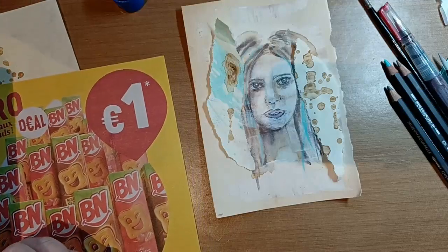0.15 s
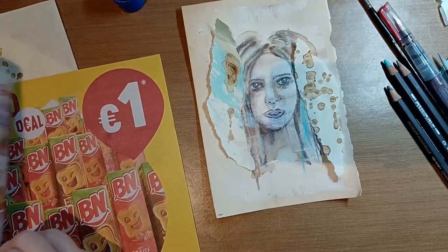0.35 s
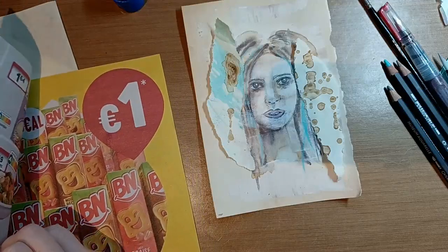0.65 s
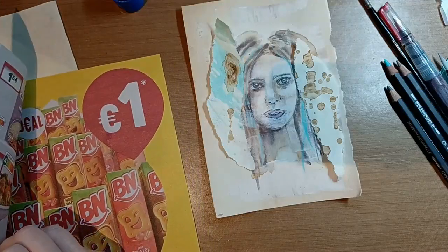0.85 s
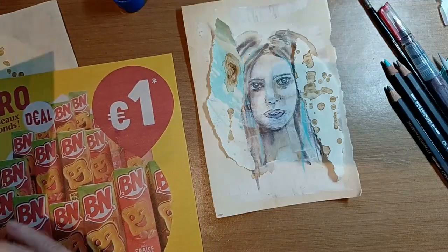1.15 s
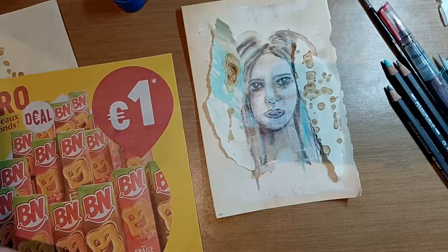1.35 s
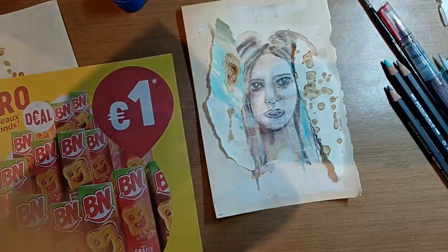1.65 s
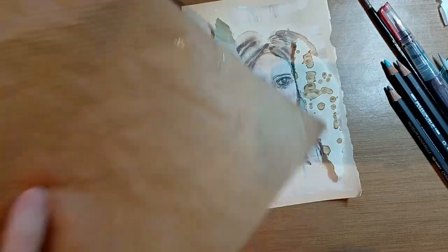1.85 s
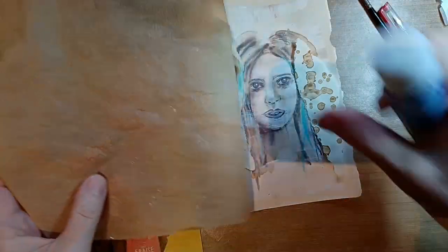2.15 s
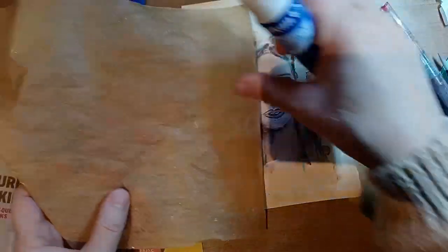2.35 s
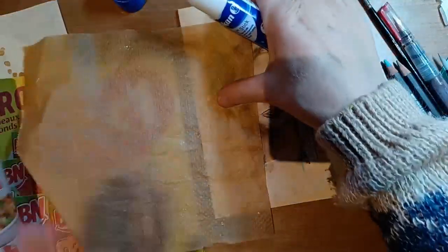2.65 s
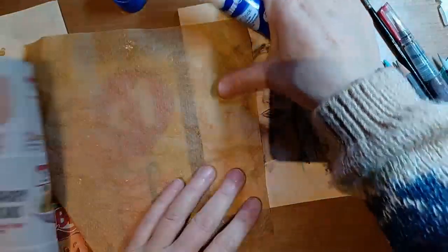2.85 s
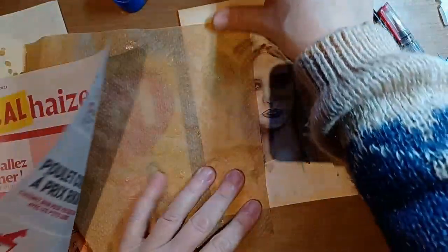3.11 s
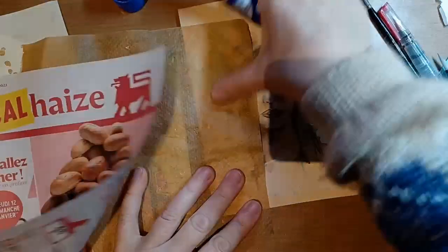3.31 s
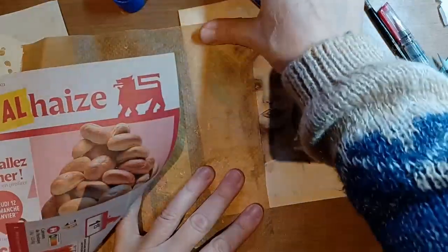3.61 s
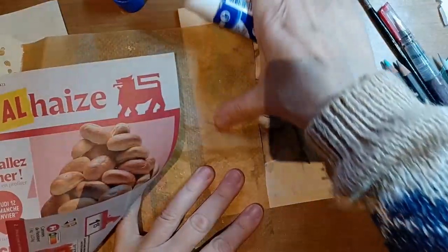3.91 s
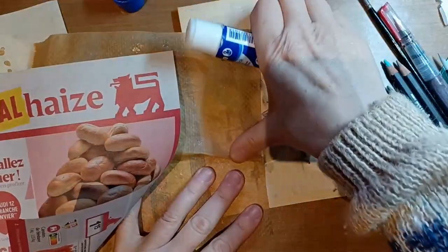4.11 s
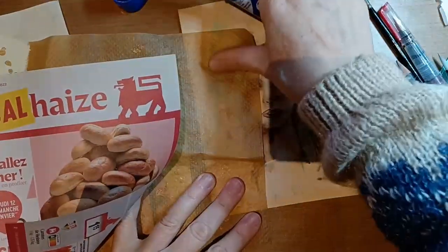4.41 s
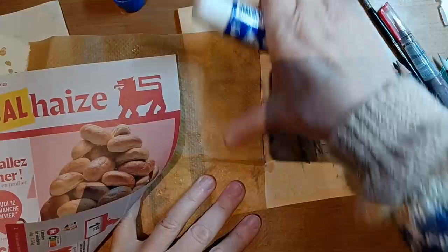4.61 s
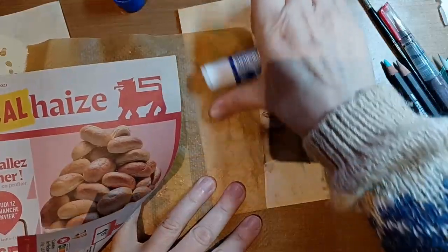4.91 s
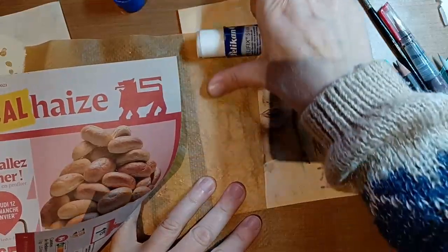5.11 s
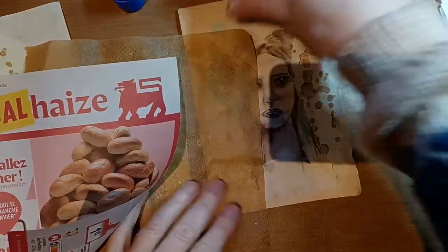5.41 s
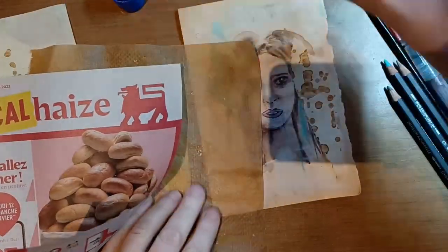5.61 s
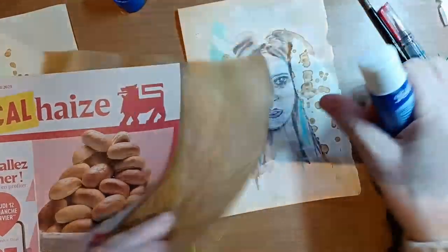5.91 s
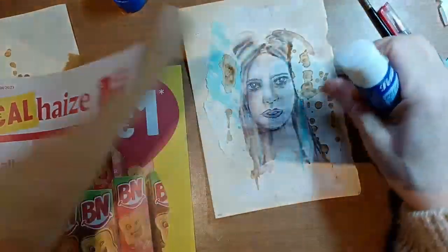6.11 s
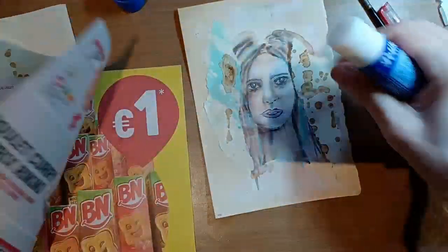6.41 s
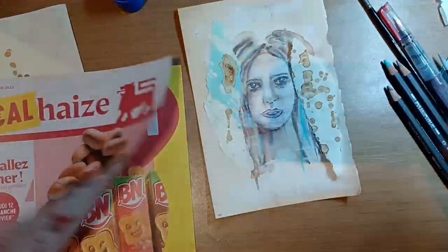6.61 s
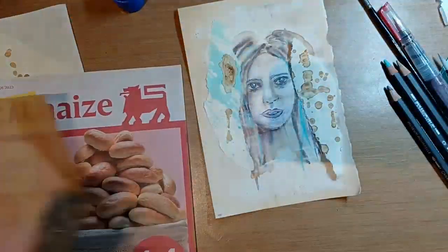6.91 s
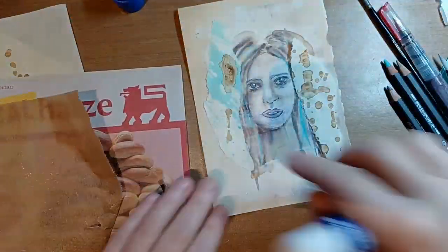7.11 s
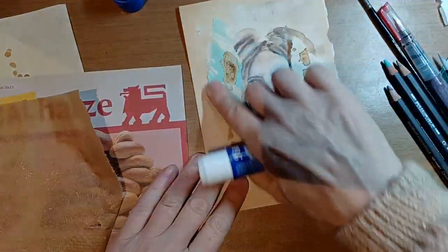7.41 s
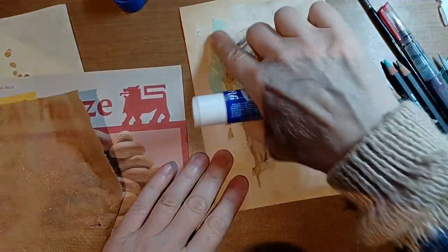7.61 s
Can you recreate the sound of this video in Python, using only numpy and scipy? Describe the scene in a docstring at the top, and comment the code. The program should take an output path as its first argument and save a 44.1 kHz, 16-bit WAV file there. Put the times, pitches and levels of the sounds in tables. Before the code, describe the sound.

A small quiet room, paper handled very close to the microphone, leaning a little left. From 0 to 0.6 s a sheet is lifted and flapped with crisp rustling and sharp snaps. After a brief lull, turning resumes from 0.8 to 1.4 s, with a short papery squeak near 1.0, and from 1.5 to 2.0 s stiffer paper crackles brightly. Shorter rustles follow at 2.2 and 2.5, then a snap with a soft low thud at 2.8. Faint sliding and isolated ticks lead to a loud bright crinkling burst at 3.9-4.1 s, with smaller rubs after. At 4.8 a rustle meets a firm, hollow wooden knock at 4.9, quickly damped. From about 5.2 s a thin steady hiss remains. A last flurry of ticks and flapping comes at 5.7-6.1 s, with a faint bump; then sparse, very soft sliding, barely above the hiss, to the end at about 7.6 s.

```python
"""Glossy and baking paper are leafed through and pushed about on a wooden desk, close to the microphone.
Sliding is noise split into smooth friction and stick-slip grains; buckles and creases are decaying bursts. The
desk echoes the rustle, buckles and creases with a gliding delay; swelling noise bands make the sheets drum or
sing. Hand bumps ring decaying modes of the desk; a small room answers the paper with a diffuse tail. Coloured
noise gives the quiet background and a thin steady hiss that sets in for the last third."""
import sys
import numpy as np
from scipy import signal
from scipy.fft import rfft, irfft
from scipy.io import wavfile
from scipy.ndimage import uniform_filter1d, map_coordinates

SR = 44100
rng = np.random.default_rng(int(sys.argv[2]) if len(sys.argv) > 2 else 0)


def to_wav(sig):
    """Store sig (one row per channel, or 1-D mono) as 16-bit WAV at the path in sys.argv[1].

    Samples outside -1..1 are clipped; the rate is SR.
    """
    pcm = np.clip(np.atleast_2d(sig), -1, 1) * 32767
    pcm = np.round(pcm).astype(np.int16)
    wavfile.write(sys.argv[1], SR, pcm.T)  # frames by channels


N = 341775
TIME = np.arange(N) / SR
BANDS_HZ = 88 * 2 ** (np.arange(16) / 2)  # half-octave centres

# stick-slip part of the sliding: (time [s], share of power [0-1])
CRINKLE = [(0, 0.95), (1.07, .6), (1.6, 1), (3.05, 0.4), (3.9, 0.97), (4.42, .95), (4.5, .15), (5.8, 1),
           (6.1, 0.7), (6.9, 0.12)]
# colour of the sliding: (frequency [Hz], relative level [dB per half octave])
SLIDE_COLOUR = [(110, -29), (220, -21), (550, -7), (1100, -11.5), (5500, -1), (8500, -6), (12000, -1.5),
                (16000, -2)]


def sliding(patchy_db, own_share):
    """Stick-slip friction: smooth rubbing noise plus grains, some broad, some confined to a zone of pitch."""
    zone_levels_db = handling()
    share = np.clip(in_time(CRINKLE)[0], 0, 1)
    own = np.clip(own_share, 0, 1)
    broad, *by_zone = [slips(per_s=360, size_db=4.8, fade_s=.0011) for _ in range(4)]
    white = rng.standard_normal((2, 3, N))
    out = 0
    for k, hz in enumerate(BANDS_HZ):
        # how far this band belongs to the flapping, rubbing and hissing zones
        weights = np.array([at_hz(list(zip((360, 1500, 7000), zone)), hz) for zone in np.eye(3)])
        slip_power = (1 - own) * broad + own * (weights @ by_zone)
        grain = np.sqrt(1 - share + share * slip_power)
        level_db = weights @ zone_levels_db + at_hz(SLIDE_COLOUR, hz)
        level_db = level_db + patchy_db * drift(45)  # bending shifts the colour
        band = rms_one(half_octave(white[k % 2] * grain, hz))
        out = out + from_db(level_db) * band * paths(hz)
    return at_ports(out)


def slips(per_s, size_db, fade_s):
    """Stick-slip releases as a random pulse train: sudden, brief, very uneven power of local mean 1."""
    sizes = from_db(size_db * np.minimum(rng.exponential(1, N), 4)) ** 2
    releases = sizes * (rng.random(N) < per_s / SR) + 1e-9
    power = signal.lfilter([1], [1, -np.exp(-2 / (fade_s * SR))], releases)
    return power / uniform_filter1d(power, size=2600)


# a sheet is lifted, bent and turned over:
# (start [s], swell [s], hold [s], rubbing level [dB], hiss of the edges [dB above the rubbing])
TURNS = [(0.0, 0.19, 0.16, -38.5, -3), (0.266, 0.006, 0.015, -34, -1), (0.39, 0.07, 0.0081, -28.5, -9.5),
         (0.728, 0.0014, 0.13, -52.5, -23), (0.81, 0.019, 0.048, -41.5, -3.5),
         (0.88, 0.053, 0.14, -30.5, -6.5), (1.085, 0.013, 0.029, -30.5, -15),
         (1.157, 0.019, 0.15, -31.5, -10), (1.47, 0.024, 0.061, -30.5, -3), (1.59, 0.014, 0.07, -32, -22),
         (1.74, 0.048, 0.21, -33, -9.5), (2.133, 0.0035, 0.012, -32, -19), (2.2, 0.0088, 0.16, -48.5, -0.5),
         (2.445, 0.0038, 0.026, -34, -10), (2.505, 0.022, 0.069, -33, -0.5),
         (5.86, 0.051, 0.025, -29, -5.5), (5.95, 0.0085, 0.45, -44.5, 1)]
# a sheet is pushed or smoothed flat on the desk:
# (start [s], swell [s], hold [s], rubbing level [dB], hiss of the edges [dB above the rubbing])
SLIDES = [(2.81, 0.0021, 0.42, -51.5, 7), (3.31, 0.12, 0.13, -54.5, 11), (3.675, 0.11, 0.073, -43, 10),
          (3.84, 0.09, 0.1, -33.5, 9), (4.165, 0.014, 0.21, -44, 11), (4.48, 0.029, 0.025, -44.5, 3.5),
          (4.672, 0.027, 0.0083, -50.5, 12.5), (4.8, 0.068, 0.052, -32.5, 3.5),
          (4.99, 0.037, 0.82, -57.5, 10.5), (5.733, 0.016, 0.043, -43, 9.5), (6.5, 0.014, 0.011, -41, -0.5),
          (6.768, 0.014, 0.074, -53.5, 17), (6.78, 0.14, 0.055, -52.5, 21.5), (7.29, 0.13, 0.16, -54.5, 5),
          (7.58, 0.028, 0.071, -41.5, -38)]
# flapping against the rubbing for a typical move: a free sheet flaps, a flat one hardly does
TURN_FLAP_DB, SLIDE_FLAP_DB = -7.5, -15
# a longer move swings more of the sheet and flaps more
FLAP_DB_PER_DOUBLING, TYPICAL_MOVE_S = 2, 0.1


def handling():
    """Power addition of all moves: levels [dB] of flapping (360 Hz), rubbing (1500 Hz), edges (7000 Hz)."""
    power = np.full((3, N), 1e-12)
    for moves, kind_db in ((TURNS, TURN_FLAP_DB), (SLIDES, SLIDE_FLAP_DB)):
        for start_s, swell_s, hold_s, rub_db, edge_db in moves:
            doublings = np.log2((swell_s + hold_s) / TYPICAL_MOVE_S)
            flap_db = kind_db + FLAP_DB_PER_DOUBLING * doublings
            zone_db = rub_db + np.array([[flap_db], [0], [edge_db]])
            power += from_db(zone_db) ** 2 * gesture(start_s, swell_s, hold_s)
    return 10 * np.log10(power) + surges()


# every move starts this far down and dies away at this rate
SWELL_FROM_DB, SETTLE_DB_PER_S = -11.5, 188
# after a move the paper goes on creeping faintly
CREEP_DB, CREEP_DB_PER_S = -26, 74


def gesture(start_s, swell_s, hold_s):
    """Power envelope of one move: it swells, holds, settles quickly and leaves a faint creep."""
    age = TIME - start_s
    swell_db = SWELL_FROM_DB * np.clip(1 - age / swell_s, 0, 1)
    after = np.clip(age - swell_s - hold_s, 0, None)
    settle_db = np.maximum(-SETTLE_DB_PER_S * after, CREEP_DB - CREEP_DB_PER_S * after)
    return (age >= 0) * from_db(swell_db + settle_db) ** 2


SURGE_DB, SURGES_PER_S = 1.5, 31  # SURGE_DB is for a fully crinkling sheet


def surges():
    """Slow stick-slip modulation [dB]: a crinkling sheet catches and lets go, a gliding one hardly does."""
    return SURGE_DB * in_time(CRINKLE)[0] * drift(SURGES_PER_S)


# buckles of a sheet: (time [s], rms level over the first 6 ms [dB], spectral tilt [dB per octave])
SNAPS = [(0.176, -19.5, 0), (0.207, -22, -1), (0.2686, -12.5, -3), (0.2817, -19.5, -5.5),
         (0.3206, -18, -0.5), (0.3488, -20.5, -1), (0.4539, -19.5, -8), (0.4798, -16, -6),
         (0.9065, -23.5, 2.5), (0.932, -21.5, -1), (0.956, -25.5, -2), (0.982, -19, -4.5),
         (1.008, -20.5, -2), (1.099, -21.5, -8), (1.176, -23, 1), (1.212, -21.5, 6), (1.2413, -16, -1.5),
         (1.327, -16, 8), (1.505, -27, -5), (1.539, -21.5, -7), (1.609, -17, 8.5), (1.666, -20.5, 10),
         (1.685, -14.5, 1.5), (1.79, -21.5, 1.5), (1.891, -14.5, 7), (1.94, -15, 5.5), (2.151, -29, -6.5),
         (2.2057, -17, -3.5), (2.4578, -23, -3.5), (2.491, -26.5, -6), (2.534, -22, -4.5),
         (2.601, -19.5, -1), (2.821, -16, 1), (3.337, -28, 0.5), (3.4627, -16.5, 15), (3.9248, -11, 0),
         (3.952, -14, -0.5), (3.9798, -12.5, 2.5), (4.0175, -13.5, 2.5), (4.209, -19, 3),
         (4.335, -18.5, -1), (4.8433, -14.5, 0), (5.875, -21.5, 0), (5.9064, -16, -4.5),
         (6.1196, -22.5, -3.5)]
# colour of an untilted snap: (frequency [Hz], relative level [dB per half octave])
SNAP_COLOUR = [(110, -54), (700, -26), (2600, -5.5), (5500, 1), (8500, -4), (12000, 0), (16000, 0)]


def snaps(crack_s, second_crack_s, flutter_s, flutter_db, uneven_db):
    """Snap-through buckling: a crack, a second as it settles, then flutter; low notes linger longer."""
    start_s, snap_db, tilt_db = np.transpose(SNAPS)
    t = np.arange(SR // 25) / SR
    white = rng.standard_normal((len(start_s), 3, len(t)))
    uneven = rng.standard_normal((len(start_s), len(BANDS_HZ)))
    since_second = t - second_crack_s * rng.uniform(.5, 2.6, (len(start_s), 1, 1))
    sounds, out = 0, np.zeros((3, N))
    for k, hz in enumerate(BANDS_HZ):
        pace = (hz / 4000) ** .3  # decay rate against that at 4 kHz
        first = np.exp(-pace * t / crack_s)
        second = .5 * (since_second > 0) * np.exp(-pace * np.abs(since_second) / crack_s)
        flutter = from_db(flutter_db) * np.exp(-pace * t / flutter_s)
        burst = white * (first + second + flutter) * paths(hz)
        octaves = np.log2(np.clip(hz, 500, 9000) / 4000)
        band_db = at_hz(SNAP_COLOUR, hz) + tilt_db * octaves + uneven_db * uneven[:, k]
        band = rms_one(half_octave(burst, hz)) * from_db(band_db)[:, None, None]
        # alternating signs let neighbouring bands join without a notch
        sounds = sounds + (-1) ** k * band
    for s, db, sound in zip(start_s, snap_db, sounds):
        onset_rms = np.std((sound[0] + sound[1:])[:, t < .006])
        add(out, sound * from_db(db) / onset_rms, s)
    return at_ports(out)


# pops of small creases: (time [s], rms level over 6 ms [dB])
TICKS = [(0.0465, -23), (0.098, -26.5), (0.168, -27), (0.341, -22), (0.473, -28), (0.998, -32),
         (1.303, -22.5), (1.31, -30), (1.396, -24.5), (1.516, -24), (1.562, -29), (1.641, -23),
         (1.764, -25.5), (1.828, -24), (1.865, -25), (2.099, -25), (3.207, -25.5), (3.223, -29.5),
         (3.486, -26), (3.676, -43), (3.7645, -23), (3.88, -20), (3.943, -18.5), (3.967, -18), (4.05, -21),
         (4.07, -21.5), (4.1, -27), (4.235, -23), (4.354, -23), (4.418, -26), (4.679, -33.5),
         (4.703, -21.5), (4.771, -29), (4.824, -26), (5.079, -30.5), (5.175, -29.5), (5.399, -26),
         (5.673, -33), (5.75, -26.5), (5.791, -26.5), (5.823, -19.5), (5.848, -19.5), (6.041, -28.5),
         (6.086, -35), (6.453, -32)]


def ticks(pop_s, centre_hz, lowest_hz):
    """Impulsive release: a crease gives way at once in one dry tick, each a little brighter or duller."""
    t = np.arange(int(.006 * SR)) / SR
    out = np.zeros((3, N))
    for s, db in TICKS:
        hz = centre_hz * 2 ** rng.uniform(-0.39, 0.42)
        pop = rng.standard_normal((len(out), len(t))) * np.exp(-t / pop_s) * paths(hz)
        pop = butter(pop, [hz / 2, hz * 2], "band", order=1)
        pop = butter(pop, lowest_hz, "high")
        add(out, pop * from_db(db) / np.std(pop[0] + pop[1:]), s)
    return at_ports(out)


# drumming and singing of a sheet:
# (centre [s], half length to 1/e [s], frequency [Hz], bandwidth [Hz], rms level at the centre [dB])
SHEET_TONES = [(0.491, 0.023, 230, 40, -35.5), (0.974, 0.077, 172, 192, -41.5),
               (1.01, 0.018, 2720, 610, -24), (1.25, 0.09, 202, 131, -43.5), (3.56, 0.047, 820, 90, -56),
               (6.94, 0.074, 5120, 897, -37)]


def sheet_tones():
    """Narrow-band resonance: a flexed sheet drums low, a rubbed glossy one squeaks or sings high."""
    out = 0
    for centre_s, length_s, hz, width_hz, db in SHEET_TONES:
        swell = np.exp(-((TIME - centre_s) / length_s) ** 2)
        edges_hz = [hz - width_hz / 2, hz + width_hz / 2]
        band = rms_one(butter(rng.standard_normal((3, N)), edges_hz, "band"))
        out = out + from_db(db) * swell * band * paths(hz)
    return at_ports(out)


# middle delay of the desk echo, its swing with the height of the sheet, and its level
BOUNCE_MS, BOUNCE_SWING_OCTAVES, BOUNCE_DB, LIFTS_PER_S = 0.916, 0.598, -7.5, 8


def off_desk(x):
    """Comb filtering by the desk echo: as the sheet rises and sinks, the peaks of its colour glide."""
    delay_ms = BOUNCE_MS * 2 ** (BOUNCE_SWING_OCTAVES * drift(LIFTS_PER_S))
    read = np.arange(N) - delay_ms * SR / 1000
    echo = np.array([map_coordinates(port, [read], order=3) for port in x])
    g = from_db(BOUNCE_DB)
    return (x + g * echo) / np.sqrt(1 + g * g)


# where the paper is: (time [s], lead of the left microphone port [ms])
PLACE = [(1.7, 0.31), (2.5, 0.12), (6.2, 0.078), (6.6, 0.4)]
PAN_DB_PER_MS = 2  # added at the left and taken off at the right


def at_ports(x):
    """Arrival-time and level difference: straight sound is late and weak at right; scatter adds to each."""
    lead_ms = in_time(PLACE)[0]
    late = map_coordinates(x[0], [np.arange(N) - lead_ms * SR / 1000], order=3)
    pan = from_db(PAN_DB_PER_MS * lead_ms)
    return np.array([(x[0] + x[1]) * pan, (late + x[2]) / pan])


# sound that reaches both ports by the straight path: (frequency [Hz], share of power [0-1])
DIRECT = [(200, 0.72), (900, 0.77), (3000, 0.18)]


def paths(hz):
    """Power division between direct and diffuse sound: gains of the straight path and of each port's scatter."""
    share = np.clip(at_hz(DIRECT, hz), 0, 1)
    return np.sqrt([share, 1 - share, 1 - share]).reshape(3, -1)


# soft blows on the desk: (time [s], peak level [dB], contact cut-off [Hz])
KNOCKS = [(2.828, -23.5, 62), (3.343, -45, 65.3), (4.858, -21, 125), (4.8942, -12.5, 1120),
          (4.924, -4.5, 1000), (4.9339, -17.5, 378), (6.117, -34.5, 800), (7.282, -45, 84), (7.34, -46, 85)]
# modes of the desk top before each blow's uneven mix: (frequency [Hz], level [dB])
DESK = [(103, -12), (177, -9), (257.5, 0.5), (274, -5.5), (333, -0.5), (368, -4.5), (438, -6.5), (598, -9),
        (813, -10), (866, -8.5), (1213, -20.5)]


def knocks(ring_t60, uneven_db, thud_hz, thud_t60, thud_db,
           clatter_db, clatter_s, clatter_hz, press_s, side_db):
    """Modal excitation: a padded blow heaves the desk, rings its top and jolts what lies on it."""
    t = np.arange(SR // 2) / SR
    out = np.zeros((2, N))
    modes = np.array([(-1) ** k * from_db(db - 60 * t / ring_t60) * np.sin(2 * np.pi * hz * t)
                      for k, (hz, db) in enumerate(DESK)])
    thud = np.sin(2 * np.pi * thud_hz * t) * from_db(thud_db) * np.exp(-np.log(1000) * t / thud_t60)
    for s, peak_db, contact_hz in KNOCKS:
        # each blow lands elsewhere and mixes the modes anew
        strengths = from_db(uneven_db * rng.standard_normal(len(DESK)))
        side_signs = rng.choice([-1, 1], len(DESK))
        top = spread(strengths @ modes, side_signs @ modes, side_db)
        noise = rng.standard_normal((2, len(t)))
        clatter = rms_one(butter(noise, [clatter_hz / 4, clatter_hz], "band", order=4))
        clatter = from_db(clatter_db) * spread(*clatter, -4.5) * np.exp(-t / clatter_s)
        pressing = 1 - np.exp(-t / press_s)
        blow = butter((top + thud + clatter) * pressing, contact_hz, "low")
        add(out, from_db(peak_db) * blow / np.abs(blow).max(), s)
    return out


def spread(mid, side, side_db):
    """Mid-side stereo: left and right from a middle and a side sound, at unchanged power."""
    g = from_db(side_db)
    return np.array([mid + g * side, mid - g * side]) / np.sqrt(1 + g * g)


ROOM_T60_S, ROOM_DB = 0.18, -8.5


def room(x, damping_hz, build_s):
    """Diffuse reverberation: reflections build up quickly and die away, the treble a little weaker."""
    t = np.arange(SR // 2) / SR
    decay = np.exp(-np.log(1000) * t / ROOM_T60_S)
    tail = rng.standard_normal((2, len(t))) * decay * (1 - np.exp(-t / build_s))
    tail = tail / np.sqrt(np.sum(tail ** 2) / 2)
    tail = butter(tail, damping_hz, "low", order=1)
    return signal.fftconvolve(x, tail, axes=1)[:, :N]


# colour of the steady hiss: (frequency [Hz], relative level [dB per Hz])
HISS = [(1200, -24), (2400, -6), (3200, 3.5), (3800, -4), (4450, 2), (5000, -8), (5700, -1), (6050, -5),
        (6850, 8), (7300, 0), (7650, 4.5), (8400, -6), (9300, -5), (9800, 0), (10400, -8.5), (15000, -12)]
HISS_START_S, HISS_FADE_S, HISS_DB = 5.19, 0.06, -44


def hiss():
    """Stationary coloured noise, faded in once and then steady."""
    fade = np.clip((TIME - HISS_START_S) / HISS_FADE_S, 0, 1)
    return from_db(HISS_DB) * fade * steady_noise(HISS)


# colour of the quiet room: (frequency [Hz], relative level [dB per Hz])
QUIET = [(35, -11), (70, -7), (240, 1.5), (420, -16), (1500, -18.5), (16000, -22)]
QUIET_DB = -60


def quiet_room():
    """Stationary coloured noise as the background level of the room."""
    return from_db(QUIET_DB) * steady_noise(QUIET)


def steady_noise(spectrum):
    """Spectral shaping of white noise into rms-1 stereo, more alike at both ports in the bass."""
    hz = np.arange(N // 2 + 1) * SR / N
    white = rfft(rng.standard_normal((3, N)))
    x = irfft(white * from_db(at_hz(spectrum, hz)) * paths(hz), N)
    return rms_one(x[0] + x[1:])


def from_db(db):
    """Logarithmic level: decibels to amplitude gain."""
    return 10 ** (np.asarray(db) / 20)


def rms_one(x):
    """Normalisation to an rms of 1."""
    return x / np.sqrt(np.mean(x ** 2) + 1e-20)


def in_time(rows):
    """Linear interpolation of each column of a curve, sample by sample."""
    s, *columns = np.transpose(rows)
    return [np.interp(TIME, s, c) for c in columns]


def at_hz(points, hz):
    """Interpolation of a spectrum on a log-frequency axis."""
    f, value = np.transpose(points)
    return np.interp(np.log(np.maximum(hz, 1)), np.log(f), value)


def butter(x, hz, kind, order=2):
    """Causal Butterworth filtering."""
    edges = np.clip(hz, 10, .45 * SR)
    return signal.sosfilt(signal.butter(order, edges, kind, fs=SR, output="sos"), x)


def half_octave(x, hz):
    """Fractional-octave filtering: the half octave around hz."""
    return butter(x, [hz / 2 ** .25, hz * 2 ** .25], "band")


def add(out, sound, s):
    """Superposition of a short sound at time s."""
    at = max(0, int(s * SR))
    out[..., at:at + sound.shape[-1]] += sound[..., :N - at]


def drift(rate):
    """Slow random modulation with a spread near 1, through rate random points per second."""
    knots = rng.standard_normal(4000)
    return np.interp(TIME * rate, np.arange(len(knots)), knots)


def scene():
    """Superposition of paper, its room reverberation, blows on the desk and the background."""
    rustle = sliding(patchy_db=3, own_share=0.27)
    buckles = snaps(crack_s=.0013, second_crack_s=.002, flutter_s=.006, flutter_db=-13, uneven_db=2.5)
    creases = ticks(pop_s=.0008, centre_hz=7000, lowest_hz=1000)
    paper = off_desk(rustle + buckles + creases) + sheet_tones()
    reverberation = from_db(ROOM_DB) * room(paper, damping_hz=8020, build_s=0.00077)
    desk = knocks(ring_t60=.18, uneven_db=1.8, thud_hz=66.2, thud_t60=0.22, thud_db=-19,
                  clatter_db=-3, clatter_s=0.027, clatter_hz=1074, press_s=0.00043, side_db=-19.0)
    return paper + reverberation + desk + hiss() + quiet_room()


CUTOFF_HZ = 15900


def record(dry):
    """Band limiting and clipping: deep bass is dropped, peaks stop at full scale, the top is cut."""
    x = np.clip(butter(dry, 54, "high", order=4), -1, 1)
    top_cut = signal.ellip(10, .2, 70, CUTOFF_HZ, fs=SR, output="sos")
    return signal.sosfilt(top_cut, x)


dry = scene()
out = record(dry)
to_wav(out)
```